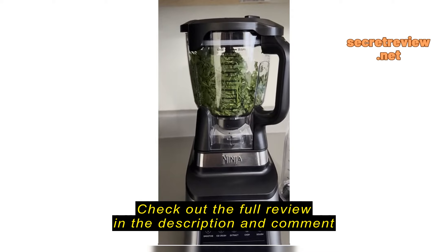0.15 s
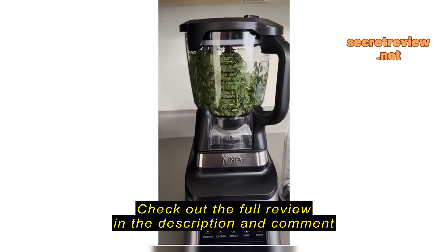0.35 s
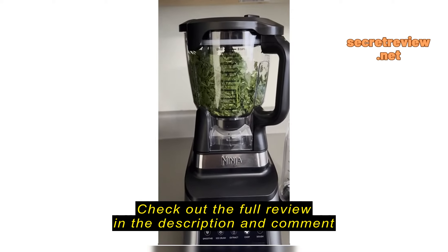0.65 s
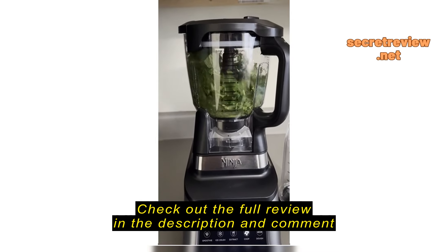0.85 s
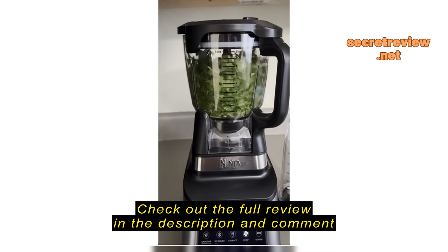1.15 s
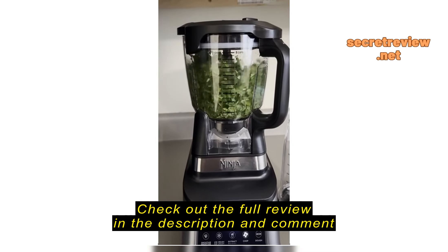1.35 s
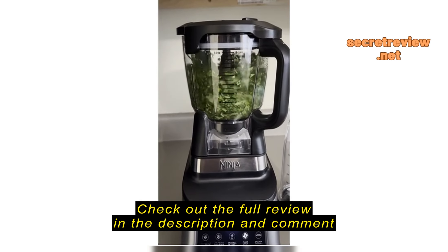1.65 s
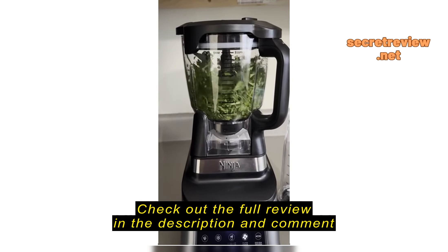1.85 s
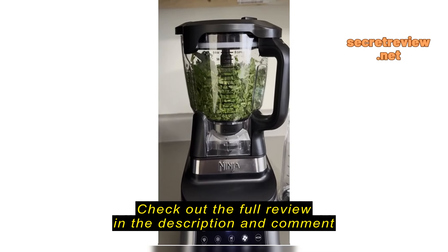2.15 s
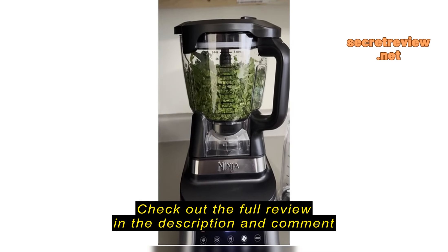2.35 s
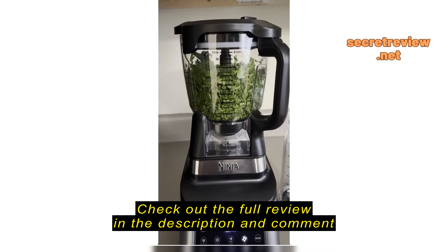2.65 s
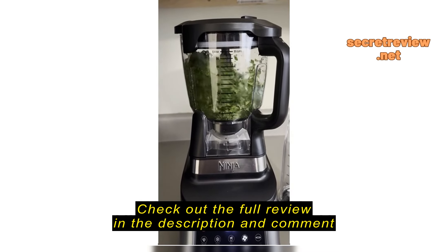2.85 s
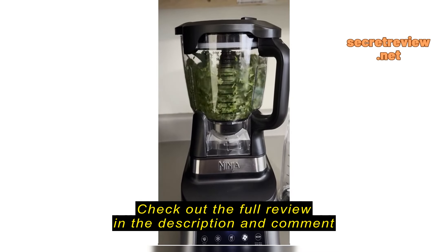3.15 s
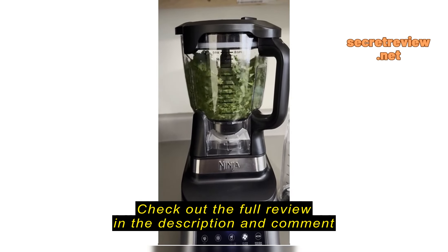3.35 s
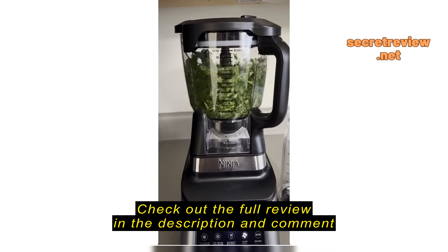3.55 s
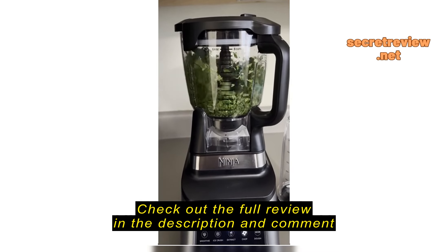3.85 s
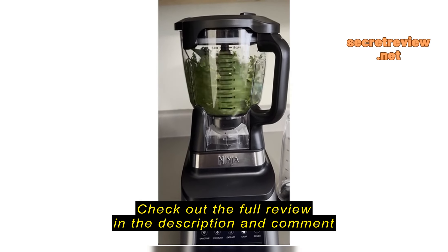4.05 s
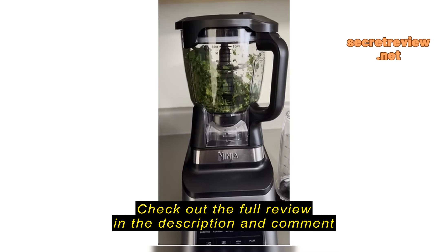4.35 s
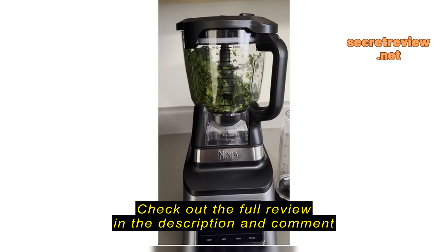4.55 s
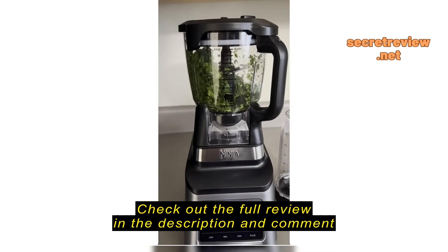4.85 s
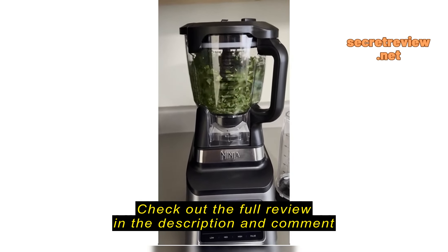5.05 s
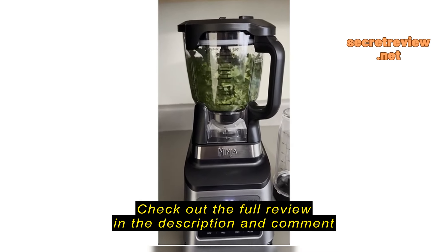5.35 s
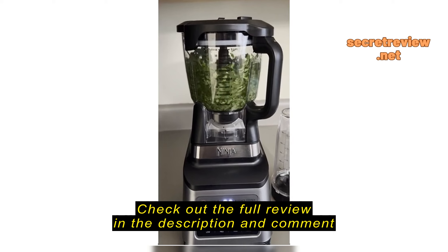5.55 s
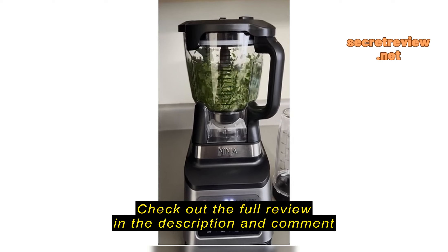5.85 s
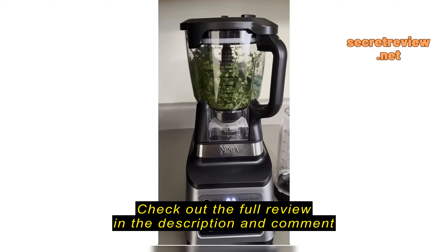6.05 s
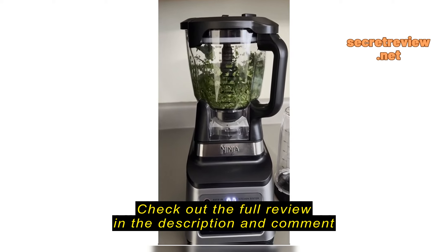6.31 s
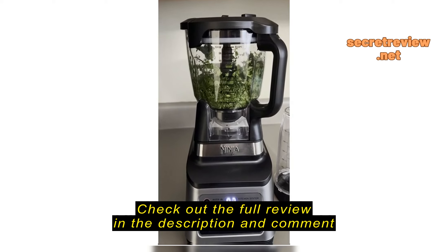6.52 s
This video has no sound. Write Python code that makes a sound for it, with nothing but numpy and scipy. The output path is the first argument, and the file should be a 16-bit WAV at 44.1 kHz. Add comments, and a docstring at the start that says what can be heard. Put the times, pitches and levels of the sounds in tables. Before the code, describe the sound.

Close in a quiet kitchen, a blender is pulsed on leafy greens. The end of one burst coasts down immediately, whine dropping and stalks thudding on the jug. After a quiet gap, two more half-second pulses follow, each with a hard knocking start, full hollow roar and air hiss, then a slowing, rattling run-down. The stereo sound has a short room echo.

```python
"""A kitchen blender is pulsed three times on leafy greens; the first pulse is about to end at the start.
Each pulse: mains hum and gear knocks as the motor bites, a roar through the housing and jug, fan hiss;
then the power drops and the rotor coasts down, its unbalance tone and fan whines falling in pitch.
Noise is shaped by resonances, knocks are clicks that ring, tones follow a computed rotor speed.
Two microphone ports, a little apart, hear it in a quiet kitchen with a short echo."""
import sys
import numpy as np
from scipy import signal
from scipy.fft import rfft, irfft, next_fast_len
from scipy.io import wavfile

SR = 44100
rng = np.random.default_rng(int(sys.argv[2]) if len(sys.argv) > 2 else 0)


def pcm_store(signal):
    """Save signal as 16-bit PCM."""
    levels = np.round(np.clip(np.atleast_2d(signal), -1, 1) * 32767)
    wavfile.write(sys.argv[1], SR, levels.astype(np.int16).T)


N = 294588
FULL_TURNS_PER_S = 432   # rotor speed at which the layer levels hold

# knocks of gears, blades and stalks on the jug: (start_s, relative level_db, relative treble_db)
KNOCK_TABLE = [(0.332, -9, -50.5), (0.376, -9.5, -55), (0.42, -6, -55.5), (0.531, -12.5, -59),
               (0.721, -10, -55), (0.61, -15, -61), (0.673, -15, -43.5), (0.75, -15, -45.5),
               (0.84, -9, -47), (1.098, -35.5, -51), (2.079, -21, -54), (2.119, -21, -33.5),
               (2.156, -11, -38), (2.178, -11, -48), (2.187, -8, -36.5), (2.220, -6.5, -39),
               (2.236, -11.5, -47), (2.248, -10, -43), (2.264, -10.5, -43), (2.401, -2.5, -28),
               (2.539, -10, -27), (2.932, -6, -53), (2.978, -9, -59), (3.085, -5, -42.5), (3.217, -21, -46),
               (3.298, -11, -49.5), (3.377, -17, -51), (3.409, -19.5, -62), (3.44, -22, -60),
               (3.461, -25, -64), (3.541, -32.5, -49.5), (3.564, -19.5, -57), (4.603, -19, -44.5),
               (4.628, -5, -29.5), (4.677, -8.5, -44), (4.844, -3.5, -54), (4.971, -4.5, -31),
               (5.003, -6, -27.5), (5.249, -2.5, -48.5), (5.446, -5, -42.5), (5.509, -10, -36),
               (5.775, -18.5, -67), (5.923, -14.5, -37), (6.01, -20, -55), (6.215, -47, -50),
               (6.234, -43.5, -61), (6.29, -54.5, -64)]
# resonances of housing and jug: (pitch_hz, width_hz, relative level_db)
JUG_MODES = [(135, 40, 11), (203.2, 31, 14), (622, 46, 7.6), (1343, 17, 8), (1400, 130, 7.4), (1465, 16, 5)]
# resonances of the air vents: (pitch_hz, width_hz, relative level_db)
AIR_VENT_MODES = [(2023, 52, -1.5), (2194, 40, 4), (2553, 46, 4), (2370, 63, 2.5), (5308, 30, 0),
                  (4250, 680, 1), (5504, 880, 0.5), (7580, 820, -0.5), (6060, 60, -1.5), (2765, 220, -5)]
# how the ports differ: (pitch_hz, difference minus sum in db, before layer gains)
PORT_SLOPE = [(60, -28.5), (125, -43.5), (250, -11.5), (500, -5), (1000, -4), (2000, -12), (4000, -0.5)]


def from_db(db):
    """dB to gain."""
    return 10 ** (np.asarray(db) / 20)


def rms_one(x):
    """Scale to rms 1."""
    return x / np.sqrt(np.mean(x ** 2) + 1e-20)


def filtered(x, order, hz, kind="low"):
    """Butterworth filter: keeps the band below, above or between the given frequencies."""
    return signal.sosfilt(signal.butter(order, hz, kind, fs=SR, output="sos"), x)


def colour(x, points, causal=True):
    """Filter with the given dB spectrum, minimum-phase or without phase shift."""
    hz = np.maximum(np.arange(2049) * SR / 4096, 10)
    table = np.array(points, float)
    log_gain = np.interp(np.log(hz), np.log(table[:, 0]), table[:, 1]) * np.log(10) / 20
    if not causal:
        return signal.fftconvolve(x, np.roll(irfft(np.exp(log_gain)), 2048))[2048:N + 2048]
    # folding the cepstrum forward gives the minimum-phase filter
    cepstrum = irfft(log_gain)
    cepstrum[1:2048] *= 2
    cepstrum[2049:] = 0
    return signal.fftconvolve(x, irfft(np.exp(rfft(cepstrum))))[:N]


def resonate(x, modes):
    """Sum of two-pole resonances."""
    out = 0
    for hz, width, gain_db in modes:
        r = np.exp(-np.pi * width / SR)
        poles = [1, -2 * r * np.cos(2 * np.pi * hz / SR), r * r]
        out = out + from_db(gain_db) * signal.lfilter([(1 - r * r) / 2, 0, (r * r - 1) / 2], poles, x)
    return out


def resonate_wavering(x, modes, waver):
    """The noise itself plus its resonances, each mode with a moving gain of its own."""
    return x + sum(gain * resonate(x, [mode]) for gain, mode in zip(waver, modes))


def drift(rate):
    """Slow chance, spread 1."""
    r = np.exp(-2 * np.pi * rate / SR)
    return rms_one(signal.lfilter([1], [1, -2 * r, r * r], rng.standard_normal(N + SR))[SR:])


def quarter_turn(x):
    """Every frequency shifted by a quarter cycle."""
    return signal.hilbert(x, next_fast_len(N))[:N].imag


def room():
    """Low, lumpy rumble of a quiet room, gathered in its modes, under a faint uneven murmur."""
    # colour of the quiet room: (pitch_hz, relative level_db per Hz)
    room_colour = [(20, -14), (45, -7.5), (72, 1), (90, -1.5), (117, -2.5), (150, -11.5), (250, -16.5),
                   (330, -18.5), (650, -31.5), (1200, -45), (2500, -52), (12000, -80)]
    # loudness over time before its drift: (time_s, level_db)
    room_loudness = [(1.301, -51), (1.75, -49.5), (1.999, -51), (3.9, -51.5), (4.498, -56), (6.399, -48),
                     (6.68, -52)]
    # resonances of the room: (pitch_hz, width_hz, relative level_db)
    room_modes = [(63, 8.7, 2), (94.5, 8.6, 7), (118, 11, -0.5), (214, 15, -1), (252.4, 20, 0.5),
                  (345.6, 10, 9), (700, 140, -1.5), (1220, 100, 7.5)]
    murmur_db = 1.2   # spread of the wavering above the rumble
    level_db = np.interp(np.arange(N) / SR, *np.transpose(room_loudness)) + 0.91 * drift(3.5)
    x = colour(rng.standard_normal(N), room_colour)
    low = signal.sosfiltfilt(signal.butter(2, 300., fs=SR, output="sos"), x)
    x = low + (x - low) * from_db(murmur_db * drift(5.4))
    return from_db(level_db) * rms_one(x + resonate(x, room_modes))


def kitchen(x):
    """Diffuse echo, one for sum and one for difference, each band dying at its own pace."""
    # kitchen echo: (pitch_hz, time to fall 60 dB in s, relative level_db)
    echo_bands = [(151, 0.52, -15.5), (400, 0.7, -15.5), (880, 0.21, -11.5), (1820, 0.49, -24),
                  (3600, 0.41, -22), (7000, .3, -24.5)]
    t = np.arange(SR) / SR
    echo = 0
    for hz, t60, level_db in echo_bands:
        band = filtered(rng.standard_normal((2, SR)), 2, [hz / 1.5, hz * 1.5], "band")
        echo = echo + from_db(level_db - 60 * t / t60) * band / np.sqrt(t60 * SR / np.log(1e6))
    return signal.fftconvolve(x[None], echo * np.minimum(t / 0.005, 1), axes=1)[:, :N]


def blows(level_db):
    """One click at each knock."""
    clicks = np.zeros(N)
    clicks[(np.array(KNOCK_TABLE)[:, 0] * SR).astype(int)] = from_db(level_db)
    return clicks


def bursts(level_db, decay_s):
    """Envelope of a dying puff of noise at each knock."""
    return signal.lfilter([1], [1, -np.exp(-1 / (decay_s * SR))], blows(level_db))


def knocking(knock_db):
    """Each blow cracks, then rings jug and housing."""
    wall_mode = (1410, 100, 10.3)   # jug wall: pitch Hz, width Hz, relative dB
    soft = filtered(blows(knock_db + 14), 2, [800, 2100], "band")
    return from_db(-8.5) * soft + resonate(soft, [wall_mode] + JUG_MODES[2:] + AIR_VENT_MODES[:3])


def thuds():
    """Stalks thud on the jug wall, and the motor thumps low as it switches on; each a short dull ring."""
    # thuds: (start_s, relative level_db, pitch_hz)
    thud_table = [(0.531, -14, 355), (0.838, -20.5, 715), (0.884, -23, 625), (0.94, -34, 615),
                  (1.024, -27.5, 320), (2.079, -30.5, 165), (2.08, -23, 345), (2.2, -23.5, 336),
                  (2.354, -17.5, 667), (2.538, -12, 646), (2.81, -16, 640), (3.109, -21, 676),
                  (3.276, -22, 664), (3.364, -17.5, 335), (3.438, -21.5, 328), (3.564, -23, 354),
                  (3.685, -31, 331), (4.579, -27, 165), (4.586, -23, 596), (4.745, -12.5, 610),
                  (4.964, -9, 630), (5.076, -12.5, 633), (5.195, -19.5, 336), (5.527, -16, 612),
                  (5.951, -29, 659), (6.006, -33, 347), (6.154, -28, 337), (6.207, -29.5, 336)]
    t60_s = 0.084   # time to fall by 60 dB
    out, t = np.zeros(N + SR), np.arange(SR // 5) / SR
    for start_s, size_db, hz in thud_table:
        fade = from_db(size_db - 6.5 - 60 * t / t60_s)
        attack = np.minimum(t / 0.0011, 1)
        out[int(start_s * SR):][:len(t)] += fade * np.sin(2 * np.pi * hz * t) * attack
    return out[:N]


def ring(clicks, hz, t60):
    """A unit click sets a sine of starting height 1 ringing."""
    r, w = from_db(-60 / (t60 * SR)), 2 * np.pi * hz / SR
    return signal.lfilter([0, np.sin(w)], [1, -2 * r * np.cos(w), r * r], clicks + 1e-18)


def chops(level_db, speed):
    """Uneven blade strikes on leaves and stalks, fewer as the blades slow, each ringing at one jug pitch."""
    # where the jug rings when they are struck: pitch_hz
    jug_pitches = [610, 658, 723, 1310, 1400, 1460, 1490, 2000, 2170, 2360, 2600, 2980]
    chops_per_s, ring_cycles = 200, 26   # strike rate before the speed factor; cycles to fall 60 dB
    sizes = from_db(4.5 * np.minimum(rng.exponential(1, N), 4)) * rng.choice([-1, 1], N)
    chance = rng.random(N) * SR / chops_per_s
    dealt = rng.integers(0, len(jug_pitches), N)   # which pitch each strike rings
    struck = sizes * (chance < .15 + speed / FULL_TURNS_PER_S)
    rings = sum(ring(struck * (dealt == k), hz, ring_cycles / hz) for k, hz in enumerate(jug_pitches))
    return from_db(level_db) * rms_one(rings)


def chopping(per_s, spread_db, grain_db, flutter_db):
    """Gain of a noise that flutters, and flares very briefly when leaves hit blade and wall."""
    hits = (rng.random(N) < per_s / SR) * from_db(abs(spread_db) * np.minimum(rng.exponential(1, N), 3.0))
    fade = np.exp(-1 / (0.00022 * SR))
    return from_db(flutter_db * drift(23)) * (1 + from_db(grain_db) * signal.lfilter([1], [1, -fade], hits))


def mains_hum(current):
    """The magnetic pull hums at twice the mains frequency and its multiples, as loud as the current."""
    # hum: (pitch_hz, level_db for a current of 1)
    hum_tones = [(120, -23.5), (240, -32), (360, -33), (480, -35.5)]
    t = np.arange(N) / SR
    return current * sum(from_db(db) * np.sin(2 * np.pi * hz * t) for hz, db in hum_tones)


def unbalance(speed, turns, running):
    """The unbalanced rotor swells each time it sweeps through a mode of the base."""
    # how the base answers the rotor: (pitch_hz, width_hz, relative level_db)
    swept_modes = [(65, 12, -1), (138, 34, 5.5), (208, 26, 7.5), (262, 40, 1)]
    height = from_db(-37 + 2 * drift(10)) * running * (speed / 200) ** .5
    wobble = height * np.sin(turns + .25 * drift(14))
    wobble = .8 * wobble + resonate(wobble, swept_modes)
    return wobble / np.sqrt(1 + (speed / 252) ** 30)   # rubber feet isolate fast shaking


def whines(speed, since, live, turns):
    """Fan blade tones, slightly blurred and clearest once the power is off, and the slot whine of the run-up."""
    # fan blade multiples: (times rotor speed, level_db before the speed and power factors)
    fan_tones = [(40, -53), (50, -51), (60, -56)]
    slot_order, slot_db = 17, -41   # rotor slots whine under heavy current: times rotor speed, dB
    blurred = turns + .008 * drift(40)
    fan = 0
    for order, db in fan_tones:
        audible = order * speed < .4 * SR   # leave out tones too high to compute cleanly
        fan = fan + from_db(db + 3 * drift(20)) * np.sin(order * blurred) * audible
    fan = fan * (speed / 300) ** 4 * (1 - .5 * live)
    strain = np.exp(-((since - .25) / .07) ** 2)
    slots = from_db(slot_db + 3.0 * drift(30)) * np.sin(slot_order * blurred) * strain
    return fan, slots


def rumble_and_drone(rumble_db, drone_db, speed, flare, running):
    """Noise rings the base: its lowest mode rumbles, its higher ones drone, and the counter groans along."""
    # base and counter: (pitch_hz, width_hz, relative level_db)
    base_modes = [(69.3, 18, 6.5), (331.4, 11, 1), (341.3, 6.1, 3.5)]
    # the geared-down blades pass the lowest mode of the base: rotor turns per s, width, dB
    centre, width, swell_db = (300, 90, 6.7)
    rumble_db = rumble_db + swell_db * np.exp(-((speed - centre) / width) ** 2)
    white = rng.standard_normal((2, N))
    lowest = rms_one(resonate(resonate(white[0], base_modes[:1]), base_modes[:1]))
    groan = rms_one(resonate(white[0], JUG_MODES[:2]))
    rumble = from_db(rumble_db) * running * lowest
    rumble = rumble + from_db(rumble_db - 4.0) * flare * running * groan
    drone = from_db(drone_db) * flare ** 1.2 * running * rms_one(resonate(white[1], base_modes[1:]))
    return rumble + drone


def vent_noise(whirr, hiss, white, waver):
    """Noise split at 3.3 kHz into blade whirr and air hiss, through the wavering vent modes."""
    low = filtered(white, 4, 3300.)
    return resonate_wavering(whirr * low + hiss * (white - low), AIR_VENT_MODES, waver)


def fan_hiss(hiss_db, air_db, flare, running, waver):
    """Blades and cooling air: noise through the vents, as sum and difference of the ports."""
    # broad colour under the modes in the sum: (pitch_hz, relative level_db per Hz)
    sum_colour = [(900, -6.5), (1700, 8.5), (2700, 2), (3200, -0.5), (4300, -7.5), (4950, -13), (5400, -7),
                  (8000, -11), (10500, -11), (12300, -45.5), (15000, -15), (16000, -15.5)]
    # the same for the difference: (pitch_hz, relative level_db)
    difference_colour = [(900, -46), (2000, -8), (3500, -16.5), (5000, -11), (6300, -26), (8000, -13),
                         (11000, -8), (16000, -18)]
    vent_waver = 0.93   # share of the jug's wavering in the vent modes
    knock_db, treble_db = np.array(KNOCK_TABLE)[:, 1:].T
    whirr = from_db(hiss_db) * flare ** 1.1 * running
    air = whirr * from_db(air_db - hiss_db)
    air = air + bursts(treble_db - 8.0, decay_s=0.026) + bursts(treble_db + 3.5, decay_s=0.002)
    whirr = whirr + bursts(knock_db - 30.5, decay_s=0.0014)
    count = len(AIR_VENT_MODES)
    # each vent mode borrows a jug mode's wavering, shifted in time
    flicker = [np.roll(waver[k % len(waver)], (k + 1) * SR // 2) ** vent_waver for k in range(count)]
    white = rng.standard_normal((2, N))
    near, far = [vent_noise(whirr, air, w, flicker) for w in white]
    # filter gains are set on plain noise
    scale = np.std(colour(vent_noise(0.62, 1.0, white[0, :2 * SR], np.ones(count)), sum_colour))
    hiss = colour(near, sum_colour, causal=False) / scale
    wide_hiss = colour(0.82 * quarter_turn(near) + 0.75 * far, difference_colour, causal=False) / scale
    return hiss, wide_hiss


def housing(deep, bright, white, waver):
    """Noise split at 900 Hz, through the broad colour and the wavering modes of housing and jug."""
    # broad colour under the modes: (pitch_hz, relative level_db per Hz)
    roar_colour = [(60, -21.5), (110, -7.5), (250, -11), (500, -6), (1000, 0.5), (1500, -5), (2200, -20.5),
                   (3500, -15), (6000, -61)]
    low = filtered(white, 2, 900.)
    return resonate_wavering(colour(deep * low + bright * (white - low), roar_colour), JUG_MODES, waver)


def housing_roar(roar_db, flare, running, current, waver):
    """Gears and greens shake the housing; gives two independent roars, one for each kind of path."""
    knock_db = np.array(KNOCK_TABLE)[:, 1]
    shake = from_db(roar_db) * flare * running + bursts(knock_db - 38.0, decay_s=0.003)
    # the torque throbs at 120 Hz, twice the mains
    shake = shake * (1 + .5 * current * np.sin(2 * np.pi * 120 * np.arange(N) / SR))
    deep = shake * from_db(-.27 * (roar_db + 18.0))   # slower contacts are softer: the lows outlast the highs
    white = rng.standard_normal((2, N))
    # filter gains are set on plain noise
    scale = np.std(housing(0.88, 1.0, white[0, :2 * SR], np.ones(len(waver))))
    return [housing(deep, shake, w, waver) / scale for w in white]


def motor():
    """Rotor speed, time since switch-on, whether current flows, and the strength of the pulse."""
    # power: (on_s, off_s, strength_db)
    power = [(-.445, 0.054, 0.5), (2.077, 2.582, 0.5), (4.575, 5.078, 0.5)]
    # each coast: (time before the greens start to brake the rotor in s, braking factor)
    coast = [(.06, 1.09), (.008, 1.03), (.058, 1.035)]
    no_load_turns_per_s, run_up_s = 448, .15   # the speed nears this value with this time constant
    # coasting: steady braking plus air drag with this time constant, before the braking factor
    friction_turns_per_s2, drag_s = 310, 5.
    t = np.arange(N) / SR
    pulse = np.searchsorted(np.transpose(power)[0], t, side="right") - 1
    on, off, strength_db = np.transpose(power)[:, pulse]
    hold, braking = np.transpose(coast)[:, pulse]
    since, idle = t - on, np.maximum(t - off, 0)
    live = np.clip((off - t) / .009 + .5, 0, 1)
    reached = no_load_turns_per_s * (1 - np.exp(-(since - idle) / run_up_s))
    idle = braking * np.maximum(idle - hold, 0)
    offset = friction_turns_per_s2 * drag_s
    speed = (reached + offset) * np.exp(-idle / drag_s) - offset
    return np.maximum(speed, 0), since, live, strength_db


def level(law, release_db, speed, pull):
    """Level in dB: a power of the speed plus the pull of the motor, dying no faster than release_db per s."""
    full_db, follows, stall, pull_db = law
    share = np.maximum(speed - stall, 0) / (FULL_TURNS_PER_S - stall) * (speed > 0)
    gain = np.hypot(from_db(full_db) * share ** follows, from_db(pull_db) * pull)
    ramp = release_db * np.arange(N) / SR
    return np.maximum.accumulate(20 * np.log10(gain + 1e-7) + ramp) - ramp


def blender():
    """The motor's speed and pull drive every layer; gives sum and difference of the two ports."""
    # each layer, before pulse strength: (level_db at full speed, dB lost per dB of speed,
    # speed of silence in turns per s, level_db from the pull of the motor)
    roar_law = (-25.5, 1.0, 24, -28.5)
    hiss_law = (-22.5, 3, 23.5, -39.5)
    air_law = (-22, 2.5, -44.5, -39)
    drone_law = (-30.5, 0.62, 10.5, -39.5)
    rumble_law = (-44.5, 0.15, 11, -49)
    chop_law = (-32.5, 1.2, 22.5, -45.5)
    # how fast roar, whirr, air, drone and rumble can die away, in dB per s
    dying_db_per_s = 130, 130, 260, 170, 120
    # share of the sum that leans right below 900 Hz, left above: (pitch_hz, level_db)
    lean_colour = [(250, -54), (600, -16.5), (900, -30), (1500, -33.5), (2500, -15), (5000, -35)]
    bite_s, grip_s = .035, 0.014   # the blades take hold of the greens; the pull builds up
    waver_db, waver_per_s = 3, 19   # the moving load damps each mode of the jug in its own rhythm
    lumpy_db = 1.5   # slow blades catch the greens in lumps: extra flutter at low speed

    speed, since, live, strength_db = motor()
    turns = 2 * np.pi * np.cumsum(speed) / SR   # rotor angle in radians
    pull = live * (1 - np.exp(-since / grip_s))
    running = np.minimum(since / .011, 1) ** 1.5
    # the current surges shortly after switch-on, then sinks to a small steady share
    current = live * running * (0.11 + np.exp(-(since - .07) ** 2 / 0.0029))
    laws = zip((roar_law, hiss_law, air_law, drone_law, rumble_law), dying_db_per_s)
    levels_db = [strength_db + level(*law, speed, pull) for law in laws]
    roar_db, hiss_db, air_db, drone_db, rumble_db = levels_db

    flare = chopping(per_s=22.0, spread_db=6.5, grain_db=-9.5, flutter_db=0.33)
    slowness = (1 - live) * (1 - speed / FULL_TURNS_PER_S) * np.minimum(speed / 50, 1)
    flare = flare * from_db(lumpy_db * slowness * drift(21))
    waver = [from_db(waver_db * drift(waver_per_s)) for mode in JUG_MODES]

    roar, far_roar = housing_roar(roar_db, flare, running, current, waver)
    hiss, wide_hiss = fan_hiss(hiss_db, air_db, flare, running, waver)
    fan, slots = whines(speed, since, live, turns)
    chop_db = strength_db + level(chop_law, 200.0, speed, pull)
    struck = (1 - np.exp(-since / bite_s)) * chops(chop_db, speed) + thuds()
    low = roar + struck + knocking(np.array(KNOCK_TABLE)[:, 1])
    low = low + rumble_and_drone(rumble_db, drone_db, speed, flare, running)
    low = low + unbalance(speed, turns, running) + mains_hum(current)

    # ports a little apart: the difference is the slope of the sum, plus reflections of its own
    apart = colour(0.2344 * quarter_turn(low) + .5 * far_roar, PORT_SLOPE, causal=False)
    both = low + hiss
    upper = signal.sosfiltfilt(signal.butter(4, 900, "high", fs=SR, output="sos"), both)
    lean = colour(2 * upper - both, lean_colour, causal=False)
    return both + slots + .05 * fan, apart + lean + wide_hiss + fan


def scene():
    """Left and right from sum and difference."""
    both, apart = blender()
    echo, wide_echo = kitchen(both)
    both = both + echo + room()
    apart = apart + colour(room() + 1.1 * wide_echo, PORT_SLOPE)
    return np.array([both + apart, both - apart])


def record(dry):
    """Faint microphone self-noise, the top cut steeply."""
    self_noise_db, cutoff_hz = -83, 16000   # noise level before its band filter
    noise = filtered(rng.standard_normal((2, N)), 2, [5000, 10000], "band")
    steep = signal.cheby2(24, 70, cutoff_hz, fs=SR, output="sos")
    return signal.sosfilt(steep, dry + from_db(self_noise_db) * noise)


dry = scene()
out = record(dry)
pcm_store(out)
```